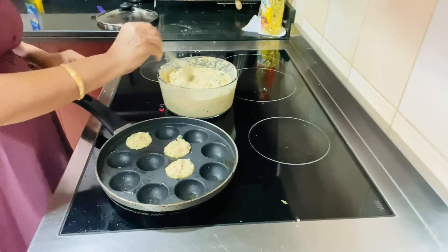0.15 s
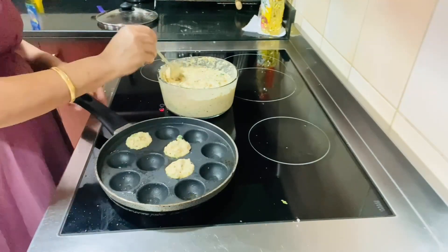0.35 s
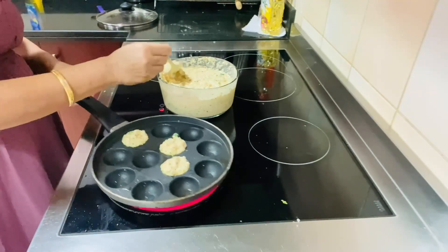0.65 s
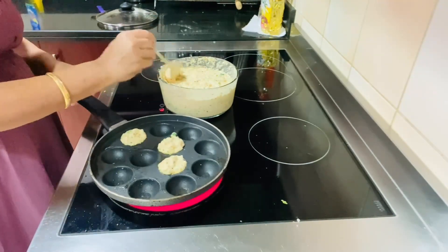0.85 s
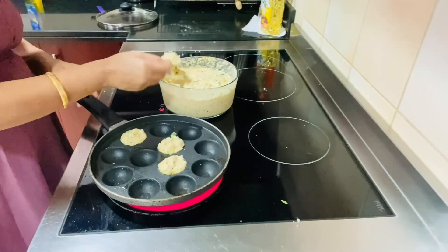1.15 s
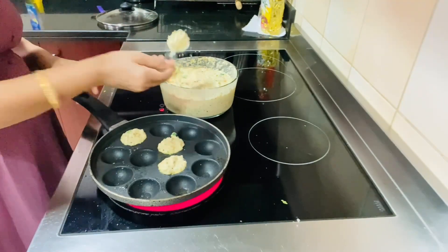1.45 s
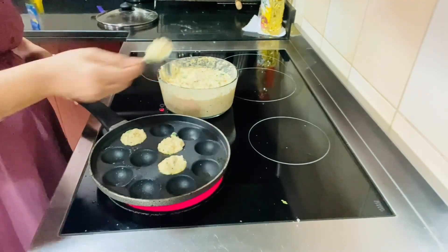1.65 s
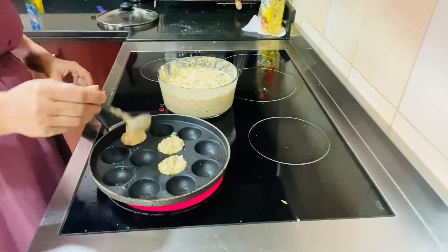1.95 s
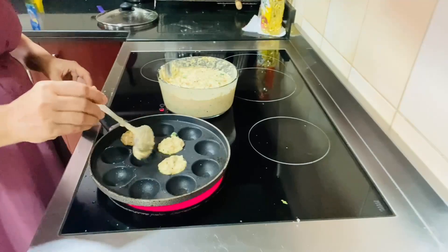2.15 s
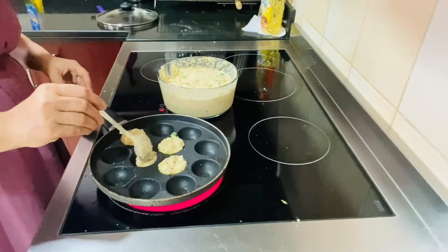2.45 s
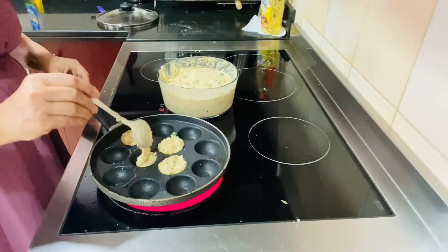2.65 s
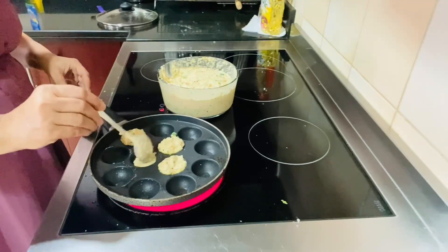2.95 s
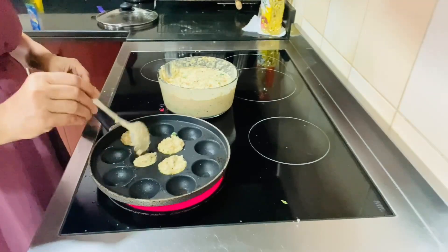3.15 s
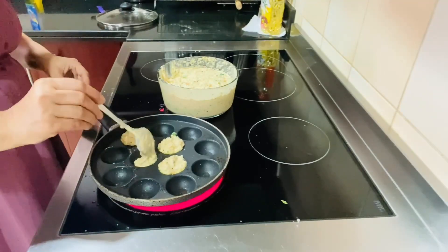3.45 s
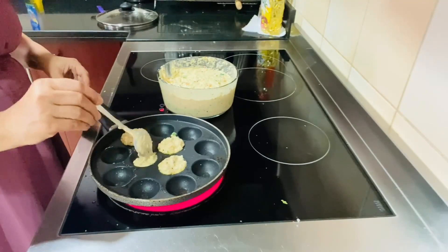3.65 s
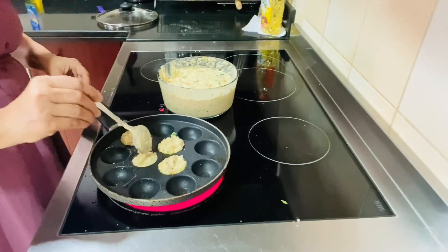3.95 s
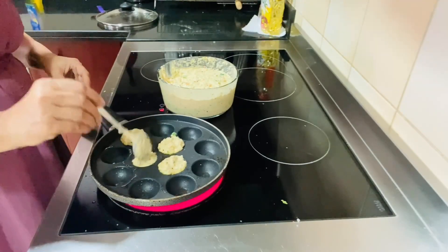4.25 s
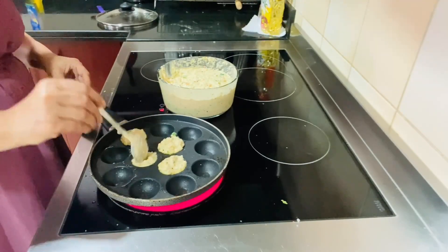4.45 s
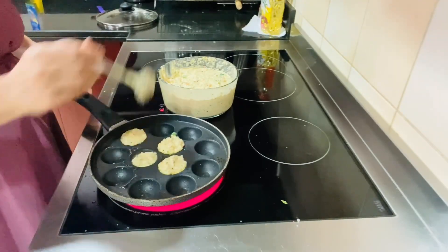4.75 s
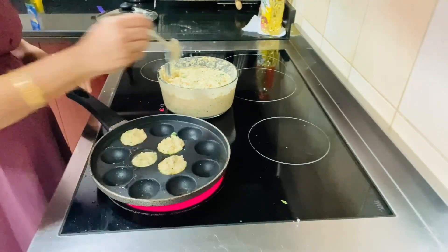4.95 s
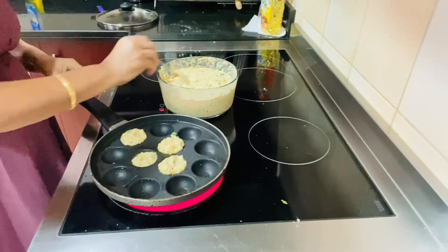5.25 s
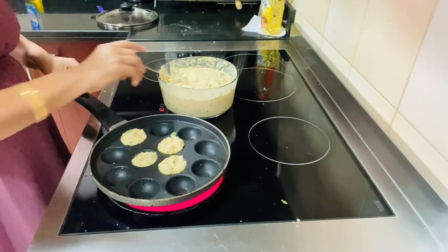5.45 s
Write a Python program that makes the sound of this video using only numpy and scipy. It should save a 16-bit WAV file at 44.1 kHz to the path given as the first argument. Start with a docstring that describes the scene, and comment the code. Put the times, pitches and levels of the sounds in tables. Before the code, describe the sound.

In a small tiled kitchen, a steady low fan hum lies under faint frying and scattered crisp ticks. A spoon snaps off a glass bowl's rim at about one second. Past two seconds, fresh batter hits hot fat with a bright sizzle that flares several times, then fades. Near the end the spoon knocks the batter-filled bowl with a short damped clink. Close stereo pickup.

```python
"""Batter spooned into a hot, greased dimpled pan fries: random bursts of steam bubbles, shaped into sizzle and fizz,
swell as each fresh spoonful lands. Ticks of spitting fat and the spoon are smeared clicks with a short ring;
the spoon snaps off the rim of a glass bowl and finally knocks on it, exciting decaying modes. The hum of a fan,
wavering tones over shaped noise, lies beneath. Echoes of the hob and a tiled kitchen reach two microphones."""
import sys
import numpy as np
from scipy import signal
from scipy.fft import rfft, irfft, next_fast_len
from scipy.io import wavfile

SR = 44100
rng = np.random.default_rng(int(sys.argv[2]) if len(sys.argv) > 2 else 0)


def wav_record(signal):
    """Record a signal, one row per channel, as 16-bit PCM in the file named by sys.argv[1]."""
    frames = np.transpose(np.atleast_2d(signal))
    bounded = np.clip(frames, -1, 1)
    # unit amplitude maps onto the largest positive 16-bit level
    quanta = np.round(bounded * 32767).astype(np.int16)
    wavfile.write(sys.argv[1], SR, quanta)


N = 247401
TIME = np.arange(N) / SR

# spectral shaping of the frying fat: (frequency [Hz], relative gain [dB])
SIZZLE_SHAPE = [(700, -13), (1400, -7.5), (2000, -5), (2500, 0), (4000, 1), (7000, 1.5), (9500, -4.5),
                (16000, -4)]
# spectral shaping of the fine fizz of steam: (frequency [Hz], relative gain [dB])
FIZZ_SHAPE = [(3000, -22), (6000, -3), (8000, -5), (9600, -4.5), (12500, 2.5), (15500, 7.5)]


def frying(level_db, spectrum, per_s, spread_db, flutter_db, count=2):
    """Shot noise: the more water meets the fat, the denser and louder the bursts; each group of dimples echoes."""
    activity = from_db(level_db - level_db.max())
    dimples = 0
    for _ in range(count):
        flutter = from_db(flutter_db * drift(14))
        grains = bursts(per_s / count * activity * flutter, spread_db)
        grains = grains / np.sqrt(activity)   # even out the power; the level is set below
        dimples = dimples + kitchen(pitched(grains), counter_db=-2.0, room_db=-1.5)
    return from_db(level_db) * coloured(pan(dimples, ring_db=3.5), spectrum)


def bursts(per_s, spread_db):
    """Poisson process: tiny steam bubbles burst at random, most of them weak and a few strong."""
    at = np.flatnonzero(rng.random(N) < per_s / SR)
    sizes = np.minimum(rng.exponential(1, N), 5)[at]
    signs = rng.choice([-1, 1], N)[at]
    out = np.zeros(N)
    out[at] = from_db(spread_db * sizes) * signs
    return out


BUBBLE_LOW_HZ, BUBBLE_HIGH_HZ = 915, 17500   # range of pitches at which the bubbles burst


def pitched(clicks, count=8):
    """Impulse response of a band-pass: each burst rings for a few cycles in one of several bands."""
    edges = np.geomspace(BUBBLE_LOW_HZ, BUBBLE_HIGH_HZ, count + 1)
    dealt = rng.integers(0, count, N)
    return sum(band(clicks * (dealt == k), edges[k], edges[k + 1]) for k in range(count))


# batter sliding onto hot fat, levels before the mixing gains:
# (time [s], flowing time [s], sizzle level [dB], fizz level [dB])
POURS = [(2.285, .13, -47.5, -43), (2.679, 0.12, -51, -45.5), (3.089, .15, -54, -48),
         (3.42, 0.062, -65, -53.5), (3.679, 0.22, -52.5, -48)]
# steady frying of the dumplings already in the pan and of the new one [dB before the mixing gains]
OLD_SIZZLE_DB, OLD_FIZZ_DB, NEW_SIZZLE_DB, NEW_FIZZ_DB = -63, -63, -53.5, -58.5
# time constants [s]; the fizz of steam dies sooner than the sizzle of the fat
LANDING_S, FLARE_ATTACK_S, SIZZLE_RELEASE_S, FIZZ_RELEASE_S = .008, .06, .38, .32


def frying_levels():
    """Incoherent sources add in power: old dumplings, the new one and the flares, in dB."""
    starts, _, sizzle_db, fizz_db = np.transpose(POURS)
    landed = 1 - np.exp(-np.maximum(TIME - starts[0], 0) / LANDING_S)
    sizzle = from_db(OLD_SIZZLE_DB) ** 2 + landed * from_db(NEW_SIZZLE_DB) ** 2
    sizzle = sizzle + flares(sizzle_db, SIZZLE_RELEASE_S)
    fizz = from_db(OLD_FIZZ_DB) ** 2 + landed * from_db(NEW_FIZZ_DB) ** 2
    fizz = fizz + flares(fizz_db, FIZZ_RELEASE_S)
    return 10 * np.log10(sizzle), 10 * np.log10(fizz)


def flares(levels_db, release_s):
    """Exponential relaxation: the power of each pour swells, holds while batter flows, then boils off."""
    power = 0
    for (s, flow_s, *_), db in zip(POURS, levels_db):
        t = np.maximum(TIME - s, 0)
        swell = 1 - np.exp(-t / FLARE_ATTACK_S)
        boil_off = np.exp(-np.maximum(t - flow_s, 0) / release_s)
        power = power + (from_db(db) * swell * boil_off) ** 2
    return power


# loudest ticks of spitting fat and the spoon, levels before ringing, echoes, pan and mixing gain:
# (time [s], body level [dB], middle level [dB], top level [dB], ring frequency [Hz])
TICKS = [(0.0169, -64, -64, -53, 4720), (0.0296, -57, -54.0, -52, 3300), (0.1229, -52, -55, -58.5, 6300),
         (0.1438, -55.0, -53, -44, 6700), (0.1545, -51.0, -45, -49, 5400),
         (0.1568, -48.5, -43.5, -46.0, 4100), (0.2546, -59, -55, -58.0, 4000),
         (0.349, -62.0, -62.0, -61.0, 3900), (0.4143, -51.5, -46, -46.5, 3300),
         (0.4306, -50, -49, -50.0, 3900), (0.4376, -54, -50.5, -51.5, 3300), (0.4426, -55, -51, -50, 6300),
         (0.569, -62.0, -58.5, -61.0, 7100), (0.625, -56, -53, -53.0, 3300),
         (0.7396, -59.0, -56.0, -56.0, 8000), (0.7706, -53.5, -58, -60, 5300),
         (0.8664, -52, -56, -55.0, 3300), (0.9429, -49, -45.0, -48, 7340), (1.0043, -56, -62, -62.0, 3300),
         (1.0273, -47.0, -42.5, -47, 6200), (1.0356, -59, -55, -58.5, 7600),
         (1.0996, -58, -64, -62.0, 3380), (1.3098, -62.0, -62.0, -59.0, 7800),
         (1.3366, -57, -54, -59.5, 7400), (1.3536, -52, -50.5, -57, 3600),
         (1.4834, -62.0, -57.5, -56.5, 7400), (1.5068, -56, -54, -58, 2400),
         (1.5302, -48.0, -43, -45.5, 6200), (1.5706, -59, -52, -53, 4380),
         (1.6786, -54.5, -57, -49.0, 2400), (1.7174, -62.0, -62.0, -62.0, 6500),
         (1.736, -50, -46, -45.5, 6000), (1.7764, -58.5, -52.0, -50, 7100),
         (1.8016, -58, -56.5, -55.0, 7300), (1.8159, -51.5, -46, -43, 7400), (2.0316, -57, -58, -55, 2400),
         (2.0626, -62.0, -58.5, -58.0, 7400), (2.079, -55, -55, -53.5, 7700),
         (2.1426, -55.5, -59, -63, 3200), (2.2666, -46.5, -46.5, -44, 3200), (2.6066, -65, -60, -46, 7600),
         (2.8735, -49, -47.5, -43.5, 7600), (3.1266, -50, -61.0, -54.0, 4000),
         (3.1356, -46.5, -50, -47.5, 3900), (3.2319, -49.5, -46, -49.0, 7800),
         (3.4294, -46.5, -49, -62.0, 4000), (3.4695, -49.0, -44, -47.0, 4000),
         (3.4963, -51, -48.5, -50, 7700), (3.5206, -59, -51, -42, 8000), (3.6876, -43.0, -40, -44, 7300),
         (3.7511, -53.0, -44, -38, 7300), (3.7706, -60, -53.0, -46.5, 7300),
         (3.8846, -53, -54.5, -43, 5100), (3.9131, -54.0, -50, -46.0, 5000),
         (4.1826, -59, -52.5, -45.5, 7700), (4.2728, -63, -50.5, -53, 6200),
         (4.3286, -62, -59, -55.0, 7100), (4.5129, -49.5, -48.5, -45, 6000),
         (4.6739, -64, -54, -51.0, 7700), (4.6921, -58, -49.5, -44, 7800), (4.7996, -55, -44.5, -45, 7500),
         (5.0509, -53.5, -47.5, -48, 5400), (5.1732, -46, -44.5, -43.5, 4000),
         (5.2596, -57, -51.5, -48.5, 7100), (5.4509, -49.5, -46.0, -55, 4500),
         (5.5151, -57, -45, -42, 7700)]
# body, middle and top of a tick: (low edge [Hz], high edge [Hz])
TICK_BANDS = [(1850, 5430), (4200, 9600), (10300, 14600)]


def spits(count=4):
    """Impulsive sources: ticks come from several spots round the hob, each with its own scatter of echoes."""
    out = 0
    for k in range(count):
        spot = np.zeros(N)
        for s, *levels, hz in TICKS[k::count]:
            click = snap([(*edges, db) for edges, db in zip(TICK_BANDS, levels)])
            add(spot, s, ringing(click, hz))
        out = out + kitchen(echoed(spot), counter_db=-2.5, room_db=-3)
    return pan(out, ring_db=1.0)


SNAP_WINDOW_S = .01
SNAP_SMEAR_HZ = 1460   # greatest width of the scattering resonances that smear a snap
CUTOFF_HZ = 15750   # upper limit of the scattering resonances and of the final low-pass


def snap(bands, count=16):
    """All-pass dispersion smears a broadband click; band levels are rms over the snap window."""
    size = int(SNAP_WINDOW_S * SR)
    hz = np.maximum(np.fft.rfftfreq(size, 1 / SR), 1)
    power = 0
    for low, high, db in bands:
        shape = 1 / (1 + ((hz ** 2 - low * high) / (hz * (high - low))) ** 4)
        power = power + from_db(db) ** 2 * shape / shape.mean()
    spectrum = np.sqrt(power * size)
    delay = np.exp(-2j * np.pi * hz / SR)   # one sample
    for centre in (np.arange(count) + rng.random(count)) * CUTOFF_HZ / count:
        width = SNAP_SMEAR_HZ * rng.uniform(0.035, 1)
        pole = np.exp((2j * np.pi * centre - np.pi * width) / SR)
        section = (1 - pole * delay) * (1 - np.conj(pole) * delay)
        spectrum = spectrum * delay ** 2 * np.conj(section) / section
    return irfft(spectrum, size)


TICK_RING_DB, TICK_RING_Q = -2.5, 8.9   # gain at the resonance relative to the click


def ringing(click, hz):
    """Resonance: lift one short ring out of a click, keeping its energy."""
    ring = signal.lfilter(*signal.iirpeak(hz, TICK_RING_Q, SR), click)
    rung = click + from_db(TICK_RING_DB) * ring
    return rms_one(rung) * np.sqrt(np.mean(click ** 2))


# first echoes of a tick, off the hob and the wall: (delay [s], level [dB])
ECHOES = [(.0015, -21), (.0058, -16.5)]


def echoed(x):
    """Specular reflection: hob and wall each throw a tick back once."""
    return x + sum(from_db(db) * np.interp(TIME - delay_s, TIME, x) for delay_s, db in ECHOES)


def crackle(per_s, spread_db):
    """Sparse Poisson impulses: faint stray pops of fat between the louder ticks."""
    pops = band(bursts(per_s, spread_db), low_hz=2440, high_hz=15000)
    return kitchen(pan(pops, ring_db=4.0), counter_db=6.0, room_db=-14)


# resonances that colour what sounds in the pan: (frequency [Hz], width [Hz], relative strength [dB])
PAN = [(873, 200, 8), (1468, 160, 2), (2330, 87, -1), (3230, 180, -5), (3930, 260, -6.5), (8170, 480, -1.5),
       (10000, 250, -27), (10900, 1030, -8)]


def pan(x, ring_db):
    """Modal resonance: the pan adds its short rings in parallel with the direct sound."""
    rings = 0
    for hz, width, db in PAN:
        rings = rings + from_db(db + ring_db) * signal.lfilter(*signal.iirpeak(hz, hz / width, SR), x + 1e-18)
    return x + rings


# direct snap on the rim: (low edge [Hz], high edge [Hz], left level [dB], right level [dB])
RIM_CLICK = [(480, 1700, -54, -44.5), (1900, 12000, -41.5, -39.5), (10300, 20000, -45.5, -44)]
RIM_S = 1.2


def rim_click():
    """Impulsive release: the loaded spoon lifts off the bowl's rim; the body is heard mostly on the right."""
    click = np.zeros((2, N))
    for side in range(2):
        bands = [(low, high, levels[side]) for low, high, *levels in RIM_CLICK]
        add(click[side], RIM_S, snap(bands, count=12))
    upper = band(click[0], low_hz=2500, high_hz=18000)
    return click + from_db(-19.5) * kitchen(upper, counter_db=14.5, room_db=13.5)


# modes of the glass bowl of batter; strong ones die fast and leave faint twins that beat on:
# (frequency [Hz], relative level [dB], 60 dB decay time [s])
BOWL = [(215, -4, .08), (321, -9, .22), (398, -11, .1), (500, -12, .3), (598, -11, .33), (705, -5, .06),
        (764, -4, .3), (1745, -8, .4), (1770, 7, .075), (1792, -11, .34), (1870, -10, .14), (2150, -9, .07),
        (2790, -1, .04), (2960, -11, .06), (3500, -4, .04), (3970, -10, .06), (4440, -14, .48),
        (4485, 2, .045), (4522, -15, .42), (6080, -8, .035), (6520, -6, .065), (8350, -12, .05),
        (11180, -3, .05)]
KNOCK_S, KNOCK_DB = 5.3335, -34.5   # onset; reference gain of modes, crack and thud
BOWL_APART_RAD = 1.69   # the ring reaches the two microphones out of step


def bowl(rise_s, crack_db, crack_s, thud_db, thud_s, rough):
    """Modal decay: the spoon strikes and chatters on the glass, damped by batter; the hob thuds beneath."""
    t = np.maximum(TIME - KNOCK_S, 0)
    apart = np.array([[0], [BOWL_APART_RAD]])
    modes = 0
    for hz, db, t60 in BOWL:
        chatter = 1 + rough * (drift(45) + 1j * drift(45))
        level = from_db(db - 60 * t / t60) * np.abs(chatter)
        modes = modes + level * np.sin(2 * np.pi * hz * t + apart + np.angle(chatter))
    contact = diffuse(N)
    crack = band(contact * np.exp(-t / crack_s), low_hz=2400, high_hz=7000)
    thud = band(contact * t / thud_s * np.exp(1 - t / thud_s), low_hz=170, high_hz=610)
    attack = 1 - np.exp(-t / rise_s)   # batter on the spoon cushions the blow
    return from_db(KNOCK_DB) * attack * (modes + from_db(crack_db) * crack + from_db(thud_db) * thud)


# rotor and motor tones: (frequency [Hz], rms level [dB], waver depth [0-1])
FAN_LINES = [(48.6, -50, 0.23), (100.3, -64.5, 0.3), (128.16, -48, 0.07), (145.8, -48.5, 0.08),
             (167.2, -53.5, 0), (246, -67, 0.54), (312.5, -66.5, 1), (435.7, -66, 0.7)]
# air rushing through the fan: (frequency [Hz], relative spectral level [dB per Hz])
FAN_AIR = [(25, -38), (45, -12.5), (62, -7.5), (84, -16), (110, -5.5), (130, -2), (152, -10.5), (174, -10),
           (194, 0), (235, -13), (500, -19), (880, -27.5), (1150, -32.5), (16000, -44.5)]
FAN_AIR_DB = -46   # rms


def fan():
    """Tonal and broadband fan noise: lines waver in strength and phase over rushing air."""
    hum = 0
    for hz, db, waver in FAN_LINES:
        wobble = 1 + waver * (drift(2.74) + 1j * drift(4.3))
        swing = wobble * np.exp(2j * np.pi * (hz * TIME + rng.random()))
        hum = hum + from_db(db) * rms_one(swing.real)
    return hum + from_db(FAN_AIR_DB) * coloured(diffuse(N), FAN_AIR)


KITCHEN_T60_S, COUNTER_T60_S = 0.24, 0.051   # decay of the tiled room and of echoes off hob and wall


def kitchen(x, counter_db, room_db):
    """Superposition: direct sound, quick echoes off hob and wall, and the tail of the tiled room."""
    near = reflections(x, COUNTER_T60_S, gap_s=.0007)
    far = band(reflections(x, KITCHEN_T60_S, gap_s=0.0056), low_hz=121, high_hz=10800)
    return x + from_db(counter_db) * near + from_db(room_db) * far


def reflections(x, t60, gap_s):
    """Exponential reverberation: dense echoes start after a gap and die away; mean energy per channel is 1."""
    t = TIME[:int(t60 * SR)]
    response = diffuse(len(t)) * from_db(-60 * t / t60) * (t > gap_s)
    response = response / np.sqrt(np.sum(response ** 2) / 2)
    return signal.fftconvolve(np.atleast_2d(x), response, axes=1)[:, :N]


# likeness of the two channels in a diffuse sound: (frequency [Hz], correlation [-1 to 1])
LIKENESS = [(60, 0.82), (130, 0.88), (200, 0.57), (300, 0.38), (600, -0.037), (1300, -0.063), (2600, 0.23),
            (4000, 0.095), (5200, -0.44), (6500, 0.13), (8000, -0.75)]


def diffuse(size):
    """Spatial coherence: white noise in two channels, with a likeness that depends on frequency."""
    padded = next_fast_len(size)
    alike = np.clip(at_hz(LIKENESS, np.fft.rfftfreq(padded, 1 / SR)), -1, 1)
    mid, side = rfft(rng.standard_normal((2, padded)))
    pair = np.sqrt(1 + alike) * mid + np.sqrt(1 - alike) * side * [[1], [-1]]
    return irfft(pair, padded)[:, :size] / np.sqrt(2)


def coloured(x, spectrum):
    """Linear filtering: weight a sound by a spectrum without shifting phase; rms 1."""
    size = next_fast_len(N)
    gain = from_db(at_hz(spectrum, np.fft.rfftfreq(size, 1 / SR)))
    return rms_one(irfft(rfft(x, size) * gain, size)[..., :N])


def band(x, low_hz, high_hz):
    """Causal band-pass filtering."""
    high_hz = min(high_hz, .45 * SR)
    sos = signal.butter(2, [min(low_hz, high_hz / 2), high_hz], "band", fs=SR, output="sos")
    return signal.sosfilt(sos, x + 1e-18)


def drift(rate):
    """Low-pass random process: slow wandering of rms about 1, with two equal poles at rate [Hz]."""
    step = 40   # samples between computed points
    r = np.exp(-2 * step * np.pi * rate / SR)
    noise = rng.standard_normal(N // step + 2002)
    slow = signal.lfilter([1], [1, -2 * r, r * r], noise)[2000:]   # skip the settling
    return np.interp(np.arange(N) / step, np.arange(len(slow)), rms_one(slow))


def at_hz(points, hz):
    """Logarithmic pitch scale: read a spectrum on a log-frequency axis."""
    f, value = np.transpose(points)
    return np.interp(np.log(np.maximum(hz, 1)), np.log(f), value)


def from_db(db):
    """Level to amplitude ratio: decibels to gain."""
    return 10 ** (np.asarray(db) / 20)


def rms_one(x):
    """Normalisation of mean power: scale to unit rms."""
    return x / np.sqrt(np.mean(x ** 2) + 1e-20)


def add(out, s, sound):
    """Superposition: mix a short sound in at a time."""
    at = int(s * SR)
    out[at:at + len(sound)] += sound[:N - at]


def scene():
    """Superposition of frying, ticks, the spoon on the bowl, and the fan."""
    sizzle_db, fizz_db = frying_levels()
    surge = from_db(0.21 * drift(17.0))   # the whole pan flares and settles
    sizzle = from_db(-2.0) * frying(sizzle_db, SIZZLE_SHAPE, per_s=10000, spread_db=5.0, flutter_db=3.0)
    fizz = from_db(2.0) * frying(fizz_db, FIZZ_SHAPE, per_s=26000, spread_db=5.0, flutter_db=2.0)
    pops = from_db(-4.0) * spits() + from_db(-37.5) * crackle(per_s=18, spread_db=1.5)
    knock = bowl(rise_s=0.00035, crack_db=4, crack_s=0.0045, thud_db=3.5, thud_s=0.013, rough=0.45)
    knock = kitchen(knock, counter_db=-17, room_db=-8)
    return surge * (sizzle + fizz) + pops + rim_click() + knock + fan()


MERGE_HZ = 8000   # above this the right channel is mostly the delayed left
TREBLE_LAG_S = .00017   # the right channel repeats the left this much later


def record(dry):
    """Interchannel delay: in the treble the right mostly repeats the left a little later; the top is cut."""
    size = next_fast_len(N + 2048)
    hz = np.fft.rfftfreq(size, 1 / SR)
    left, right = rfft(dry, size)
    merged = .96 / (1 + (MERGE_HZ / np.maximum(hz, 1)) ** 16)   # shared part of the power
    late_left = left * np.exp(-2j * np.pi * hz * TREBLE_LAG_S)
    right = np.sqrt(1 - merged) * right + np.sqrt(merged) * late_left
    pair = irfft(np.array([left, right]), size)[:, :N]
    low_pass = signal.ellip(10, .2, 70, CUTOFF_HZ, fs=SR, output="sos")
    return signal.sosfilt(low_pass, pair)


dry = scene()
out = record(dry)
wav_record(out)
```